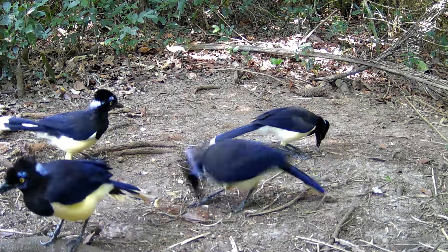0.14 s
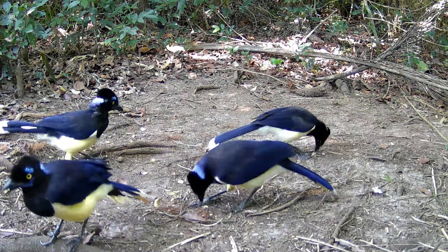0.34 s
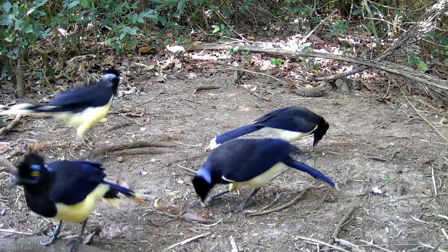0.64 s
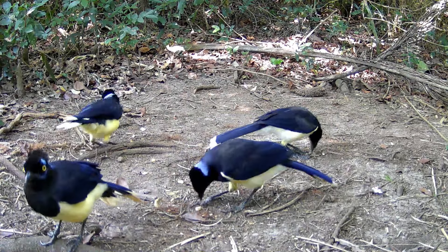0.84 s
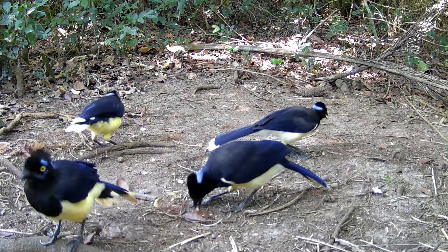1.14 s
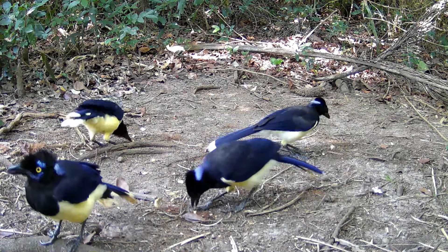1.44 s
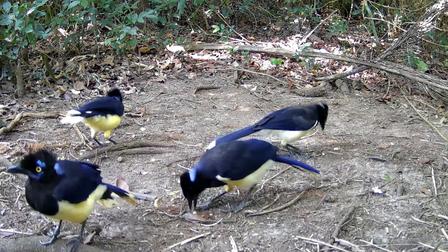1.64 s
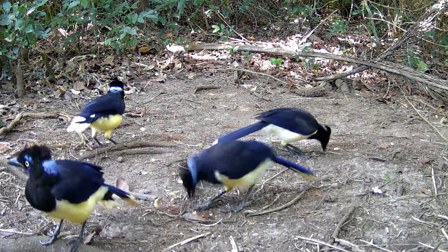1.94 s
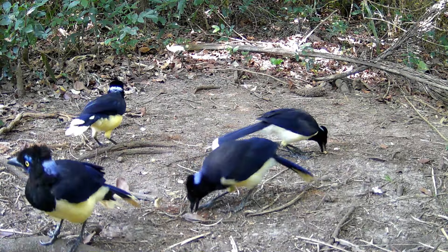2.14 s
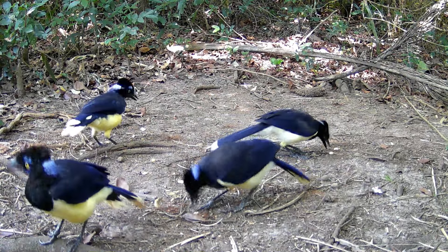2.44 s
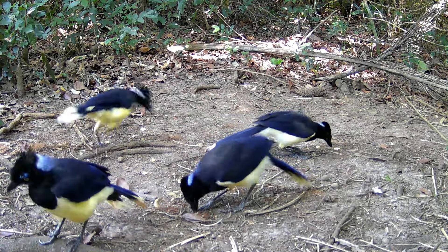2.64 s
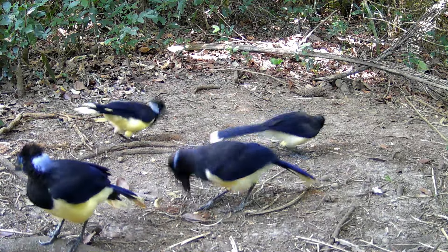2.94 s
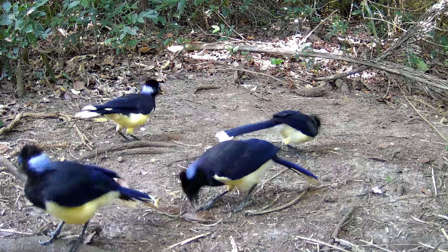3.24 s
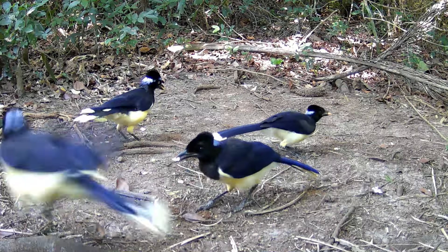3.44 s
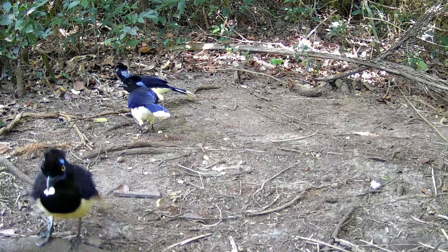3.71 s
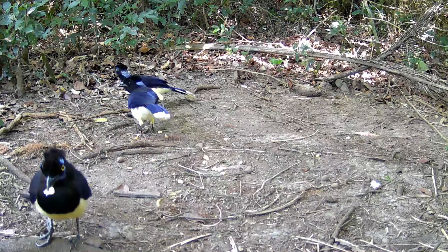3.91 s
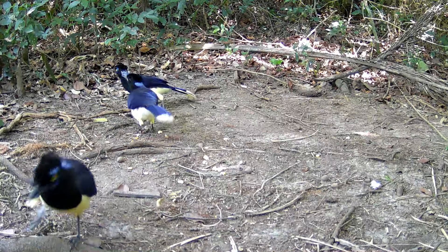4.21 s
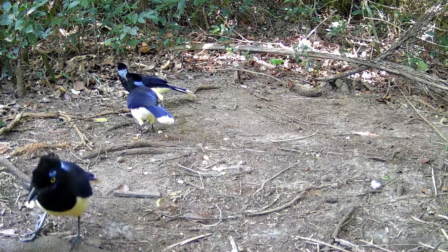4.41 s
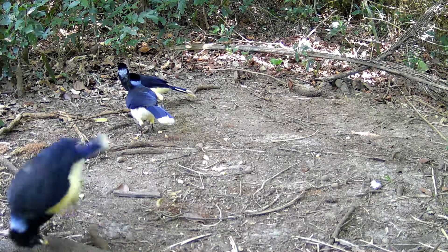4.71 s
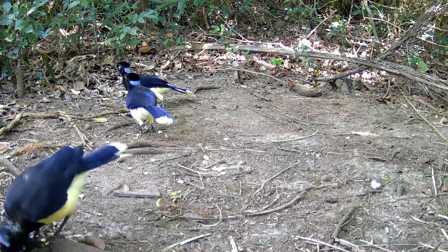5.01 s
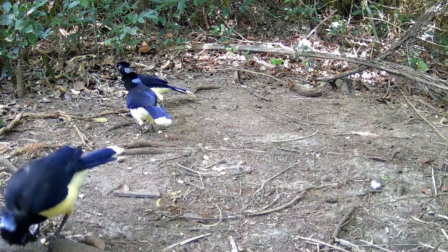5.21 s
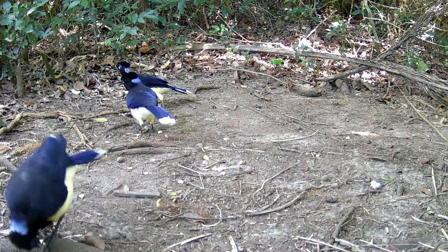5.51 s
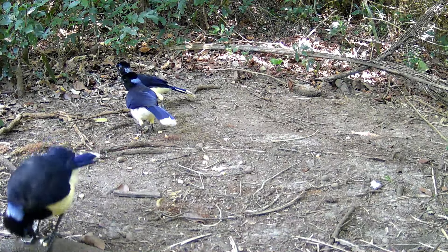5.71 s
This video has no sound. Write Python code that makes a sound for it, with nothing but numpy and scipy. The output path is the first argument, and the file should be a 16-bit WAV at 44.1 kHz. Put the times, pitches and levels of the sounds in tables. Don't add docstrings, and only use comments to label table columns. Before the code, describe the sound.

A forest floor with steady low rumble and soft, dull hiss, heard by a small fixed camera with coarse, gritty treble. A harsh jay chack is already under way at 0 s, mixed with the end of another bird's held tone; a very short, close chack snaps at 0.12 s. Thin, very high small-bird notes flicker faintly around 0.3-0.4 s. Far whistles drop quickly at 0.6 and 0.9 s, blurred by leaves, with a soft landing at 0.9. Sparse bill taps tick on twigs and soil, the loudest at 2.2 s; a dull thump falls at 2.65. The second burst brings chacks at 2.96, 3.07 and 3.2 s, far falling whistles at 3.17 and 3.45, and a louder, clear near whistle sweeping down at 3.8 s, all with short trunk echoes. A landing thuds at 4.0. Then light taps, clustered around 4.75-5.05, a faint high falling note at 4.7, and barely audible leaf shuffles until the end.

```python
import sys
import numpy as np
from scipy import signal
from scipy.io import wavfile
from scipy.ndimage import uniform_filter1d

SR = 44100
rng = np.random.default_rng(int(sys.argv[2]) if len(sys.argv) > 2 else 0)


def generate_wav(sig):
    pcm = np.round(np.clip(np.atleast_2d(sig).T, -1, 1) * 32767).astype(np.int16)
    wavfile.write(sys.argv[1], SR, pcm)


def attenuation_scalar(level_db):
    decades = np.asarray(level_db, float) / 20
    return 10 ** decades


N = 258271
LEAD = 4410
CAMERA_HZ = 16000

# start in seconds, length in seconds, peak in dB, from Hz, to Hz.
HELD_NOTE = (-.034, .042, -34, 2720, 2620)
# start in seconds, length in seconds, low voice dB, high voice dB,
# top pitch of the high voice in Hz.
CHACKS = [
    (-.022, .046, -30.5, -30.5, 2850),
    (2.963, .044, -32, -29, 3316),
    (3.074, .044, -29.5, -28, 3065),
    (3.205, 0.034, -33, -28.5, 3004),
]
# share of length, low voice Hz, its dB, high voice as share of its top, its dB.
CHACK_SHAPE = [(0, 1807, -25, 0.91, -40), (.13, 1748, -4.5, .99, -17), (.3, 1777, 3, .9, -3.5),
               (.48, 1715, -11.5, .77, 0.5), (.57, 1422, -4.5, .68, -10.5), (.72, 922, -2.5, .51, -8),
               (.86, 683, -13, .44, -10), (1, 450, -10, 0.53, -36)]
# time in seconds, low voice Hz, its dB, high voice Hz, its dB.
CLOSE_CHACK = [(.118, 1850, -68, 3495, -86), (.123, 1782, -30.5, 3490, -50), (.129, 1652, -24, 3208, -33),
               (.135, 1830, -26, 2600, -19.5), (.14, 1444, -24.5, 2165, -25), (.143, 1284, -35, 1720, -25),
               (.147, 1026, -33.5, 1460, -25.5), (.151, 630, -41.5, 1500, -36), (.154, 473, -47, 1390, -59)]
# at start in dB, at end in dB.
CHACK_SUM_DB = (-1, -4.5)
CLOSE_SUM_DB = (-32, 27)
# Hz, dB.
PORT = [(300, 8), (1500, -5.5), (2800, -12.5), (3600, -10.5), (4400, -20), (5200, -16.5), (6400, -2.5),
        (8000, 0.5)]
# delay in seconds, level in dB.
TRUNKS = [(.0045, -14), (.013, -13.5), (0.018, -16), (0.031, -26)]
# Hz, t60 in seconds.
FOREST_T60 = [(400, 0.2), (1500, 0.4), (3000, 0.44), (7000, 0.6)]
# Hz, density in dB per Hz.
FLOOR_SPECTRUM = [(12, -17.5), (22, 0.5), (70, -6.5), (100, -17), (150, -20), (330, -27.5), (1000, -33.5),
                  (2000, -38), (2800, -43), (3600, -51), (4300, -56.5), (5200, -63.5), (6400, -56.5),
                  (7900, -52.5)]
# time in seconds, peak in dB, ring in Hz, bright snap in dB relative.
TICKS = [(.3, -48, 1180, -19), (.5964, -55, 3760, -15), (.9848, -48, 1400, -6), (1.0394, -60, 2170, -27),
         (1.3087, -50.5, 1570, -13), (1.3791, -46, 1820, -41), (1.4172, -52, 1270, -33),
         (1.7544, -54, 1270, -11), (1.805, -46.5, 1360, -43), (1.933, -46, 1640, -15),
         (2.2053, -35.5, 1270, -27), (2.2618, -53, 1210, -23), (2.4897, -45, 2200, -26),
         (2.5623, -58, 1430, -28), (2.61, -46, 1790, -19), (3.691, -47.5, 2080, -22),
         (4.1312, -45.5, 1870, -18), (4.222, -40, 1690, -15.5), (4.4456, -55, 1400, -15),
         (4.556, -49, 1380, -33), (4.755, -53, 1470, -21), (4.813, -43, 2290, -32), (4.874, -49, 1520, -30),
         (4.8996, -53, 1830, -9.5), (4.938, -54, 1850, -22), (4.9742, -48.5, 2070, -12),
         (5.0355, -46, 1370, -19), (5.3981, -54, 2230, -27), (5.5972, -53.5, 1480, -13),
         (5.683, -46, 2680, -30.5)]
# time in seconds, peak in dB, ring in Hz, bright snap in dB relative.
THUMPS = [
    (0.881, -42.5, 565, -27),
    (2.206, -41, 570, -27),
    (2.656, -44, 262, -43),
    (3.989, -38, 577, -25),
]
# start in seconds, length in seconds, peak in dB, from Hz, to Hz.
THIN_NOTES = [
    (.314, .06, -66, 7150, 6350),
    (.366, .055, -62, 6400, 6980),
    (.33, .09, -62, 7300, 7950),
    (4.69, .11, -63, 7950, 6050),
    (4.74, .06, -69, 7580, 7630),
    (2.945, .027, -56, 1150, 1185),
]
# start in seconds, length in seconds, level in dB,
# throat tuning as a ratio, drag on the opening drop.
FAR_WHISTLES = [
    (0.614, 0.13, -37, 1.01, 0.95),
    (.878, 0.12, -37, 0.97, 1.09),
    (3.174, .127, -35.5, 1.043, 1.25),
    (3.453, 0.12, -38, 1.026, 0.92),
]
# share of length, Hz.
GLIDE = [(.06, 3500), (0.171, 2599), (.29, 2160), (0.571, 1498), (.71, 1105), (.83, 950), (1, 753)]
# Hz, dB.
PASSAGE = [(780, -13.5), (960, -11), (1150, -24), (1480, 2.5), (1800, -16.5), (2200, -4.5), (3300, -12.5),
           (4500, -17)]
# resonance in Hz, width in Hz, gain in dB.
THROAT = [(1520, 100, -15.5), (2170, 130, 6.5), (4470, 1100, 6.5)]
# time in seconds, Hz.
NEAR_PITCH = [(3.814, 4630), (3.82, 3987), (3.832, 3255), (3.85, 2488), (3.864, 2280), (3.92, 1726),
              (3.94, 1169), (3.958, 1000), (3.983, 850)]
# time in seconds, level in dB.
NEAR_EFFORT = [(3.814, -45.5), (3.82, -26.5), (3.843, -18.5), (3.858, -26), (3.88, -27), (3.913, -20.5),
               (3.937, -22.5), (3.955, -21.5), (3.981, -34.5)]
# Hz, dB relative.
SECOND_HARMONIC = [(1800, -21), (2300, -31), (3000, -23.5), (3800, -22.5), (4400, -33), (5500, -50.5),
                   (6800, -36), (7800, -16.5)]
# Hz, dB relative.
THIRD_HARMONIC = [(2700, -24.5), (3600, -36.5), (5000, -30.5), (6200, -30), (7000, -38), (7500, -62.5),
                  (12000, -58)]
# start in seconds, end in seconds, level in dB.
RUSTLES = [
    (4.201, 4.27, -67),
    (4.742, 4.827, -69),
    (4.865, 4.91, -72.5),
    (4.936, 5.067, -88),
    (5.58, 5.723, -77.5),
]


def evened(x):
    return x / np.sqrt(np.mean(x ** 2) + 1e-20)


def read(points, hz):
    f, value = np.transpose(points)
    return np.interp(np.log(hz + 1), np.log(f + 1), value)


def add(mix, s, sound):
    part = mix[round(max(s, 0) * SR):][:len(sound)]
    part += sound[:len(part)]


def unroll(rows):
    s, *columns = np.transpose(sorted(rows))
    t = np.arange(s[0], s[-1], 1 / SR)
    return s[0], [np.interp(t, s, c) for c in columns]


def slow_noise(samples, n):
    return evened(uniform_filter1d(rng.standard_normal(4 * 4096), size=samples))[:n]


def band(x, order, low_hz, high_hz):
    return signal.lfilter(*signal.butter(order, [low_hz, high_hz], "bandpass", fs=SR), x)


def phase(hz, waver):
    drift = slow_noise(60, len(hz))
    return 2 * np.pi * (np.cumsum(hz * (1 + waver * drift)) / SR + rng.random())


def port(hz):
    return attenuation_scalar(read(PORT, hz))


def soft_ends(x):
    return x * signal.windows.tukey(len(x), min(.004 * SR / len(x), 1))


def echoes(x):
    out = np.zeros(len(x))
    for delay, db in TRUNKS:
        add(out, delay, attenuation_scalar(db) * x)
    return out


def forest(x, start=.008, t60_scale=0.97):
    taps = np.zeros(SR)
    at = np.arange(0, SR - 20, 20)
    taps[at + rng.integers(0, 20, len(at))] = rng.choice([-1., 1.], len(at))
    hz, t, z = signal.stft(taps, SR, nperseg=256)
    t60 = t60_scale * read(FOREST_T60, hz)[:, None]
    tail = signal.istft(z * attenuation_scalar(-60 * t / t60), SR, nperseg=256)[1]
    tail = np.append(np.zeros(round(start * SR)), tail / np.linalg.norm(tail))
    return signal.fftconvolve(x, tail)[:len(x)]


def whistle(hz, level_db, waver, flutter_db, second_db):
    flutter = slow_noise(180, len(hz))
    p = phase(hz, waver)
    tone = np.sin(p) + attenuation_scalar(second_db) * port(2 * hz) * np.sin(2 * p)
    return soft_ends(attenuation_scalar(level_db + flutter_db * flutter) * tone)


def thin_note(start, length, peak_db, from_hz, to_hz):
    u = np.arange(0, length, 1 / SR) / length
    hz = to_hz + (from_hz - to_hz) * (1 - u) ** 2
    level_db = peak_db - 7 * (2 * u - 1) ** 2
    return start, whistle(hz, level_db, waver=0.0037, flutter_db=5.5, second_db=-90)


def patterned(start, length, low_db, high_db, top_hz):
    return [(start + u * length, hz, low_db + low, top_hz * share, high_db + high)
            for u, hz, low, share, high in CHACK_SHAPE]


def chack(rows, sum_db, waver=0.022):
    s, (low_hz, low_db, high_hz, high_db) = unroll(rows)
    low, high = phase(low_hz, waver), phase(high_hz, waver)
    voices = attenuation_scalar(low_db) * np.sin(low) + attenuation_scalar(high_db) * np.sin(high)
    voices += attenuation_scalar(low_db - 15) * port(2 * low_hz) * np.sin(2 * low)
    voices += attenuation_scalar(high_db - 13) * port(2 * high_hz) * np.sin(2 * high)
    both = attenuation_scalar((low_db + high_db) / 2)
    growth = attenuation_scalar(np.minimum(np.linspace(*sum_db, len(low)), 11))
    voices += both * growth * port(low_hz + high_hz) * np.sin(low + high)
    voices += both * attenuation_scalar(-23) * port(2 * low_hz + high_hz) * np.sin(2 * low + high)
    voices += both * attenuation_scalar(-25) * port(low_hz + 2 * high_hz) * np.sin(low + 2 * high)
    return s, voices


def near_calls():
    calls = np.zeros(N + LEAD)
    chacks = [chack(CLOSE_CHACK, CLOSE_SUM_DB)]
    chacks += [chack(patterned(*row), CHACK_SUM_DB) for row in CHACKS]
    for s, sound in chacks:
        add(calls, s + LEAD / SR, soft_ends(sound))
    s, sound = thin_note(*HELD_NOTE)
    add(calls, s + LEAD / SR, sound)
    thicket = attenuation_scalar(-29.5) * forest(calls, start=0.057, t60_scale=0.163)
    close_scatter = attenuation_scalar(-10.5) * forest(calls, start=0.011, t60_scale=0.18)
    wide_scatter = attenuation_scalar(-23) * forest(calls)
    return (calls + echoes(calls) + close_scatter + wide_scatter + thicket)[LEAD:]


def floor():
    frames, hz = N // 256 + 5, np.fft.rfftfreq(1024, 1 / SR)
    a, b, patches = rng.standard_normal((frames, 513, 3)).T
    patches = uniform_filter1d(patches, size=12, axis=0)
    patches = evened(uniform_filter1d(patches, size=14, axis=1))
    rustle = evened(uniform_filter1d(rng.standard_normal(frames), size=5))
    rustle = rustle * np.clip(hz / 2500, 0, 1)[:, None]
    z = (a + 1j * b) * attenuation_scalar(read(FLOOR_SPECTRUM, hz)[:, None] + 1.2 * patches + 1.5 * rustle)
    return attenuation_scalar(-50) * evened(signal.istft(z, nperseg=1024, noverlap=768)[1][:N])


def ticks(events, t60, low, high):
    out, t = np.zeros(N), np.arange(4000) / SR
    grit = rng.standard_normal((len(events), 2, len(t)))
    fade = attenuation_scalar(-60 * t / t60) * np.minimum(t / 0.0024, 1)
    for (s, peak_db, hz, snap_db), (a, b) in zip(events, grit):
        ring = evened(band(a, 2, hz * low, hz * high))
        ring = signal.lfilter(*signal.butter(4, 3300, fs=SR), ring)
        snap = evened(band(b, 2, 5200, 9000))
        add(out, s, attenuation_scalar(peak_db + 1) * fade * (ring + attenuation_scalar(snap_db) * snap))
    return out + attenuation_scalar(-15) * forest(out, t60_scale=0.95)


def thin_notes():
    thin = np.zeros(N)
    for row in THIN_NOTES:
        add(thin, *thin_note(*row))
    return attenuation_scalar(-4) * thin + attenuation_scalar(-8) * forest(thin, start=0.00079, t60_scale=0.64)


def far_whistle(start, length, level_db, tuning, drag):
    t = np.arange(0, length, 1 / SR)
    opening = (0, 4773 / max(drag, 1))  # Hz, lower when the drop drags
    share, glide_hz = np.transpose([opening] + GLIDE)
    hz = np.interp((t / length) ** drag, share, glide_hz)
    gap_db = -13 * np.exp(-((hz - 4020) / 160) ** 2)
    level_db = level_db + read(PASSAGE, hz / tuning) + gap_db
    return start, whistle(hz, level_db, waver=0.007, flutter_db=2.5, second_db=-16.5)


def far_path(x):
    direct = signal.lfilter(*signal.butter(2, 2600, fs=SR), x)
    sideways = x.copy()
    for hz, width, db in THROAT:
        sideways += attenuation_scalar(db) * signal.lfilter(*signal.iirpeak(hz, hz / width, fs=SR), x)
    early = attenuation_scalar(-4.5) * forest(x, start=0.0017, t60_scale=0.23)
    return attenuation_scalar(-1.5) * direct + early + attenuation_scalar(-8) * forest(sideways, start=0.0055)


def far_whistles():
    far = np.zeros(N)
    for row in FAR_WHISTLES:
        add(far, *far_whistle(*row))
    return far_path(far)


def near_whistle():
    s, (hz,) = unroll(NEAR_PITCH)
    level_db = np.interp(s + np.arange(len(hz)) / SR, *np.transpose(NEAR_EFFORT))
    p = phase(hz, .005)
    upper = sum(np.sin(k * p) * np.exp(-((k * hz - 7600) / 900) ** 2) for k in range(4, 9))
    tone = np.sin(p) + attenuation_scalar(read(SECOND_HARMONIC, 2 * hz)) * np.sin(2 * p)
    tone += attenuation_scalar(read(THIRD_HARMONIC, 3 * hz)) * np.sin(3 * p)
    sound = attenuation_scalar(level_db) * (tone + attenuation_scalar(-37.5) * upper)
    lag = round(0.0032 * SR)
    bounce = np.append(np.zeros(lag), sound[:-lag])
    bounce /= np.sqrt(1 + (1500 / hz) ** 4)
    near = np.zeros(N)
    add(near, s, soft_ends(sound + attenuation_scalar(-10) * bounce))
    scatter = attenuation_scalar(-23.5) * forest(near, t60_scale=0.64) + attenuation_scalar(-23) * forest(near)
    return near + attenuation_scalar(-4.5) * echoes(near) + scatter


def rustles():
    out = np.zeros(N)
    bursts = np.minimum(rng.exponential(1, N // 64 + 1), 3)
    crackle = rng.standard_normal(N) * attenuation_scalar(6.6 * np.repeat(bursts, 64)[:N])
    crackle = evened(band(crackle, 2, 900, 3000))
    for start, end, db in RUSTLES:
        part = crackle[round(start * SR):round(end * SR)]
        add(out, start, attenuation_scalar(db) * part * np.hanning(len(part)))
    return out


def scene():
    birds = near_calls() + thin_notes() + far_whistles() + near_whistle()
    taps = ticks(TICKS, t60=0.016, low=.65, high=1.4)
    thumps = ticks(THUMPS, t60=0.044, low=.78, high=1.22)
    return (birds + floor() + taps + thumps + rustles())[None]


def top_cut(x):
    return signal.sosfilt(signal.butter(12, 15680, fs=SR, output="sos"), x)


def record(dry):
    padded = np.pad(dry[0], (0, 441), "reflect")
    coarse = signal.resample_poly(padded, 160, 441, padtype="reflect")
    lifted = signal.oaconvolve(coarse, [-.12, 1.24, -.12], "same")
    calls = signal.lfilter(*signal.butter(2, 600, "highpass", fs=CAMERA_HZ), lifted)
    loudness = np.sqrt(abs(uniform_filter1d(calls ** 2, size=64)))
    steps = rng.standard_normal(len(lifted))
    steps = signal.lfilter(*signal.butter(3, 5600, "highpass", fs=CAMERA_HZ), steps)
    lifted += attenuation_scalar(-36) * loudness * steps
    lines = np.interp(np.arange(N) / SR, np.arange(len(lifted)) / CAMERA_HZ, lifted)
    held = lifted[np.round(np.arange(N) * CAMERA_HZ / SR).astype(int)]
    lines += 0.031 * (held - lines)
    lines *= np.minimum(np.arange(N)[::-1] / 200, 1)
    return top_cut(lines[None])


dry = scene()
out = record(dry)
generate_wav(out)
```